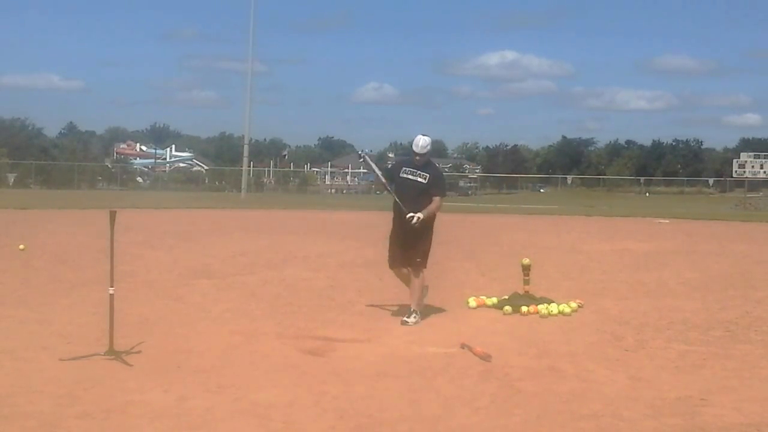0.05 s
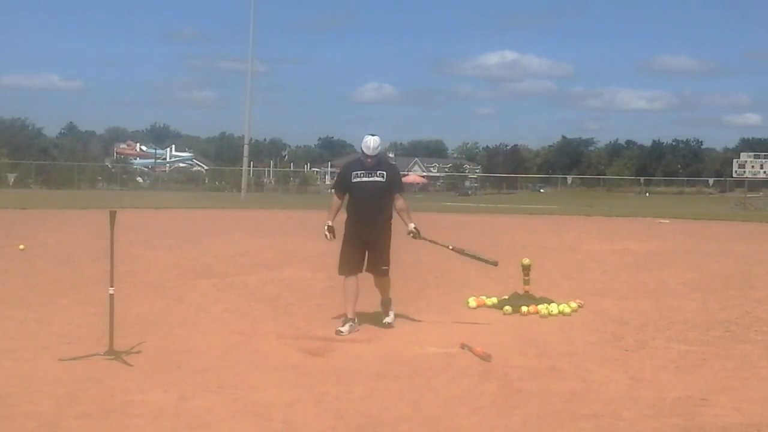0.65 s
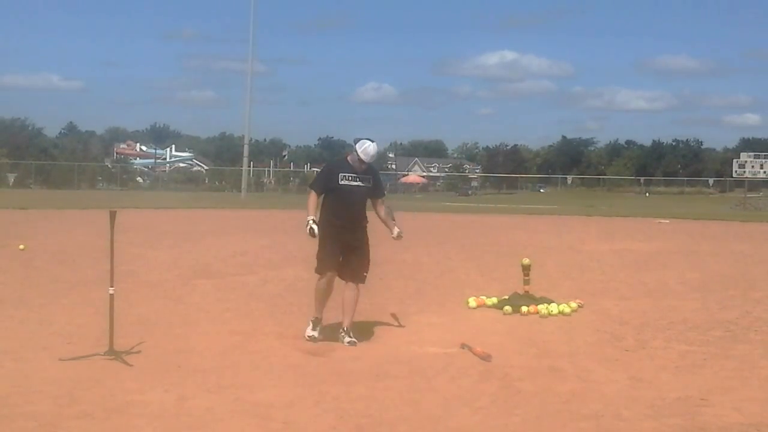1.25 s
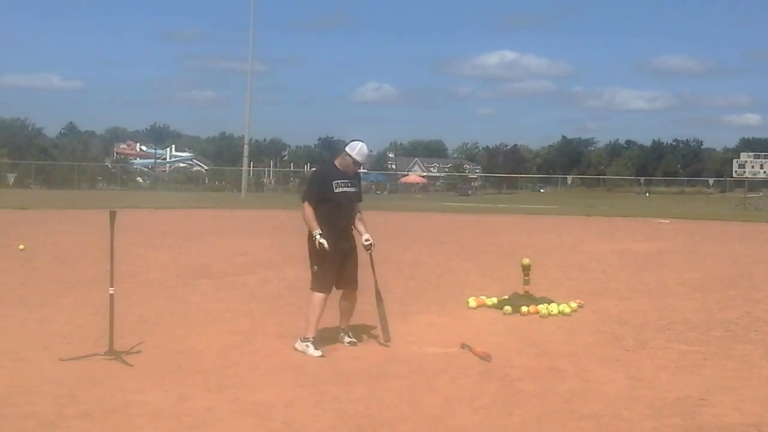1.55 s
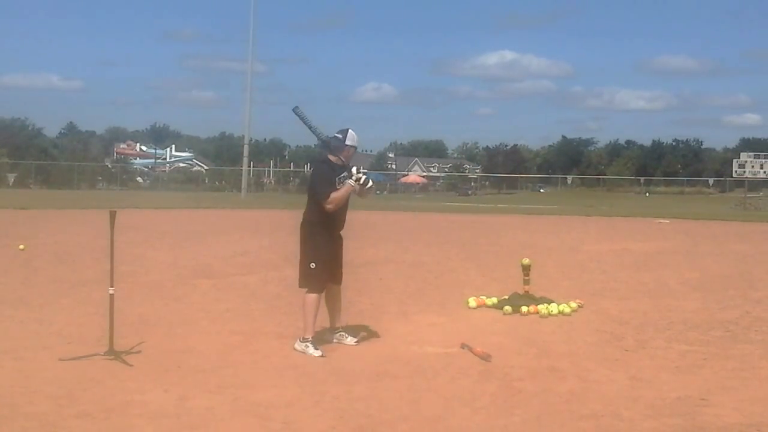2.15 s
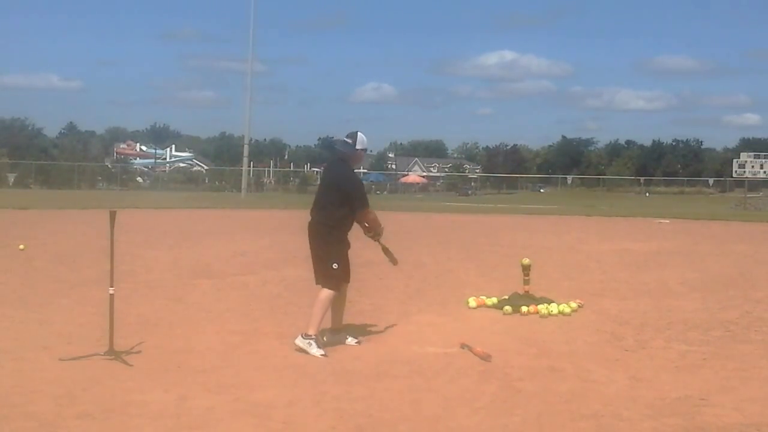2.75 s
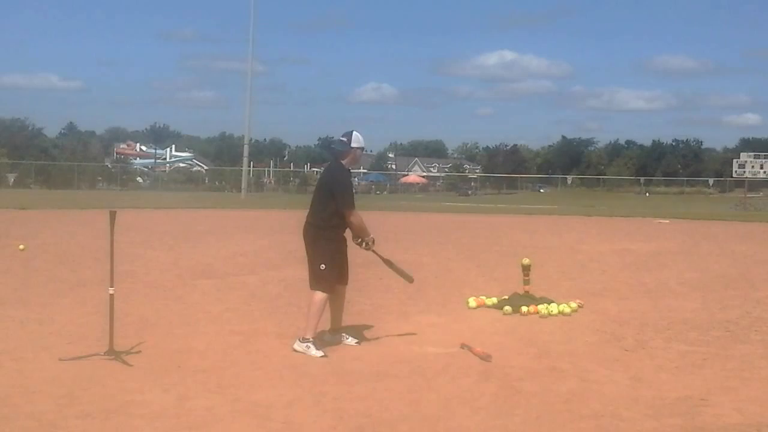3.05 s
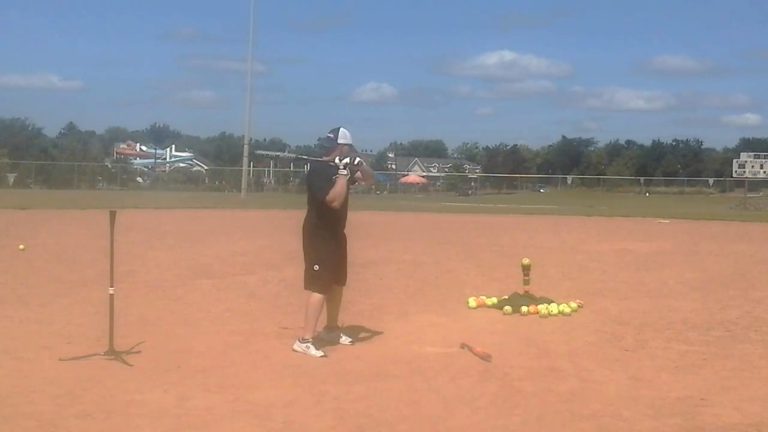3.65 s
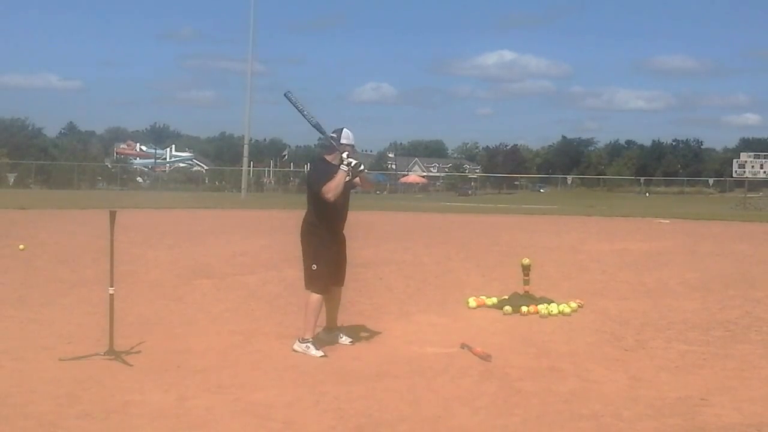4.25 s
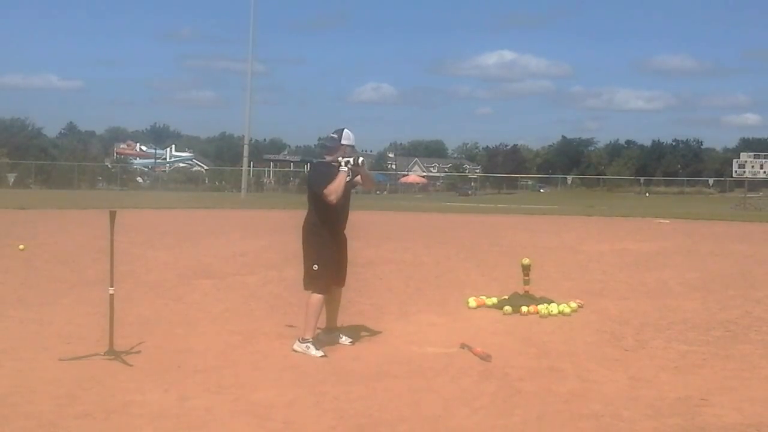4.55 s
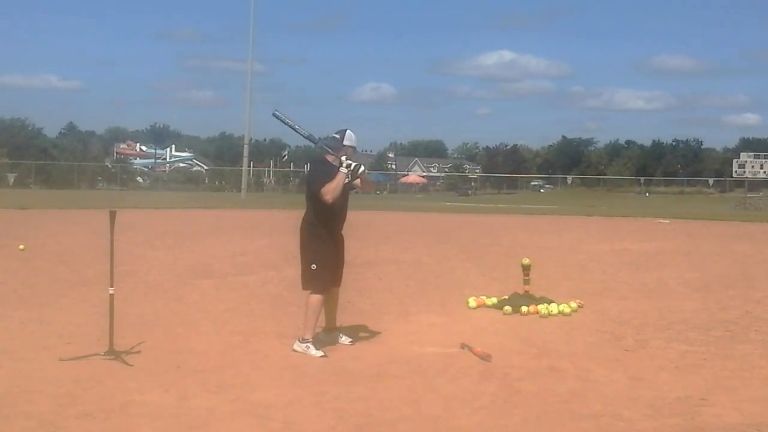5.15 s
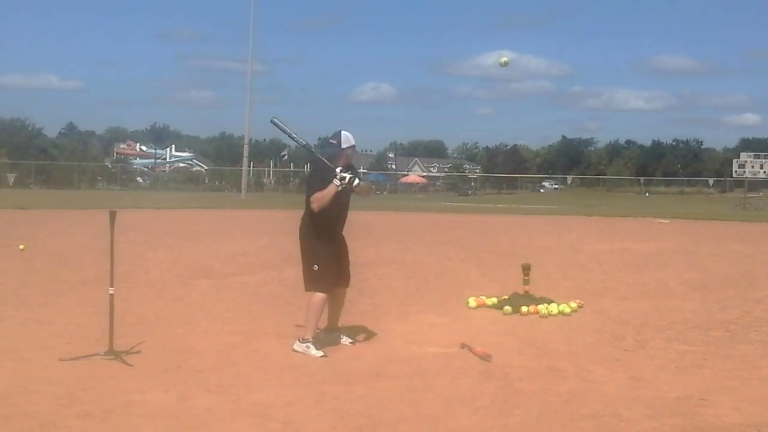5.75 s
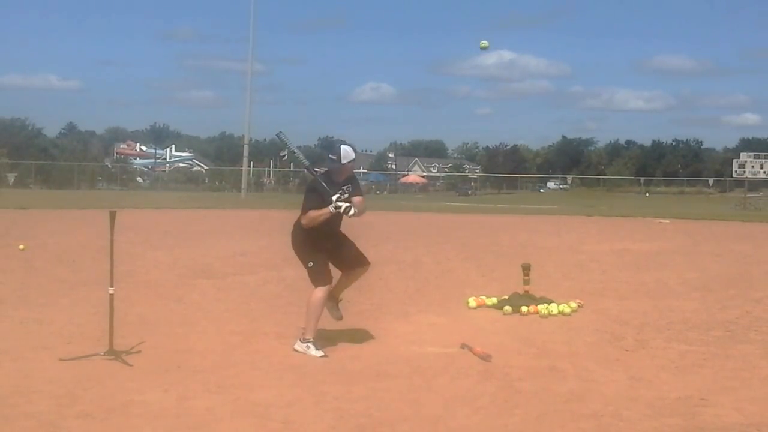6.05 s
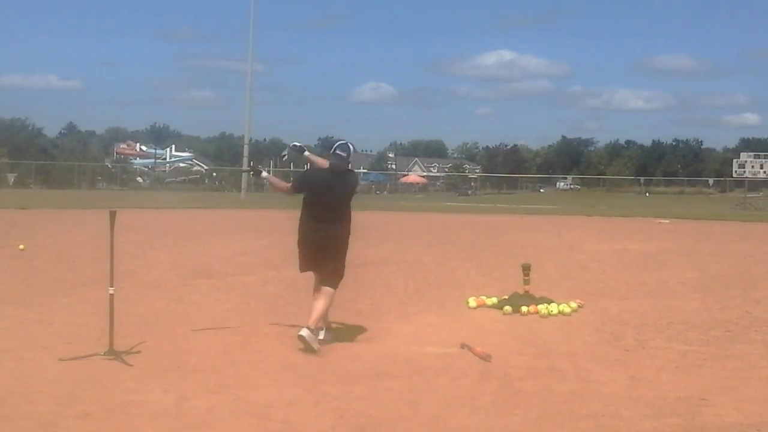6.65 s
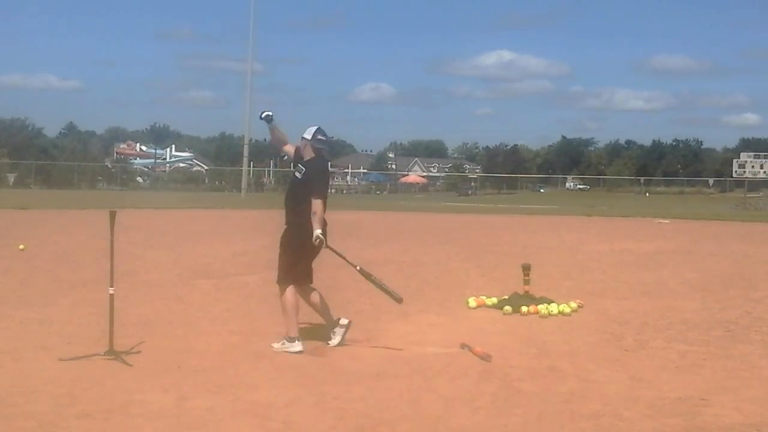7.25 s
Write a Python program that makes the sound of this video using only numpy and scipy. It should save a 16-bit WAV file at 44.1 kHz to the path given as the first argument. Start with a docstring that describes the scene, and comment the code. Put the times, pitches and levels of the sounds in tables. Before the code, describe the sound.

From the start there is a quiet open field: a faint, high shimmer of insects, a cricket chirping unevenly and a few thin bird whistles over low distant rumble and fine hiss. A far engine putters with rapid rasping puffs. At about 3.6 seconds a light breeze begins bumping softly on the microphone, and the engine ebbs between 4 and 5 seconds. At about 5.4 seconds a launcher lobs a ball with a short, soft, hollow pop and a slightly whistling spit of air that quickly trails off. At about 6.6 seconds a bat meets the ball with one sharp, bright, ringing crack, by far the loudest sound, briefly overloading the microphone. Quick echoes return from fences and trees and die away within a second. The engine drifts back in, and the insects carry on until the end at about 7.4 seconds.

```python
"""Batting practice on an open softball field. Insects and a few thin birds sing from the start, over the
rasping puffs of a far engine. Midway a light breeze picks up on the microphone and the engine ebbs.
At 5.4 s a launcher lobs a ball with a hollow pop and a whistling spit of air. At 6.6 s the bat meets it
with one sharp, ringing crack that overloads the microphone and echoes from fences, banks and trees,
while the engine drifts back in."""
import sys
import numpy as np
from scipy.fft import rfft, irfft, next_fast_len
from scipy.io import wavfile
from scipy.ndimage import map_coordinates

SR = 44100
rng = np.random.default_rng(int(sys.argv[2]) if len(sys.argv) > 2 else 0)


def unload_wav(signal):
    """Save mono or channel-first audio to the path in sys.argv[1] as 16-bit WAV at rate SR, clipped to [-1, 1]."""
    wavfile.write(
        sys.argv[1],
        SR,
        np.round(np.clip(np.atleast_2d(signal).T, -1, 1) * 32767).astype(np.int16),
    )


N = 326119
T = np.arange(N) / SR
HIT_S = 6.6412  # bat meets ball


def bat():
    """The blow sets off ringing tones under a bright contact snap and a short burst of noise."""
    # ringing tones of the crack, including a late-swelling ring near 5 kHz:
    # pitch_hz, level_db, t60_s, rise_s, left_over_right_db
    tones = [(300, -24, 0.013, .0003, 0.5), (560, -14, 0.013, .0003, 0.5), (840, -13, 0.011, .0003, -2.5),
             (1106, -4.5, .046, .0035, 6), (1470, -16.5, 0.041, 0.0011, 14.5),
             (1610, -20.5, .054, .0003, 10), (1710, -3.5, 0.015, 0.00019, -4.5),
             (2030, -16, .022, .0003, 0), (2190, -18, 0.096, .002, -2), (2712, -23.5, 0.085, .0005, 9),
             (3220, -26, 0.068, .0005, -4), (3740, -23, 0.075, .00055, -5), (4480, -23, 0.056, .001, -14),
             (4660, -19, 0.076, .001, -1), (4875, -.5, 0.032, 0.0038, -12), (5060, -22, .06, .004, 0),
             (5030, -14, 0.033, .001, -4), (5600, -24, .05, .001, -2), (5800, -25, 0.042, .0004, 1),
             (6047, -4, 0.027, 0.00012, 1.5), (7230, -25, .06, .001, -1), (7180, -21, .028, .00026, 0),
             (7220, -21, 0.032, .0005, -9), (7750, -36, 0.033, .0003, 4), (8100, -34, .035, .0003, 0),
             (8700, -29, .02, .0003, 0)]
    # spectrum of the first instant of contact: frequency_hz, relative_db
    contact_eq = [(1000, -20), (5000, -2), (8000, 0), (11000, -12), (14000, -5), (16000, -5)]
    # spectrum of the noisy body of the crack: frequency_hz, relative_db
    crack_eq = [(60, -28), (250, -23), (650, -16), (1100, -3), (1400, 0), (1800, 3), (2500, -7.5),
                (4100, -7.5), (5100, 3.5), (6100, 1), (7500, -1.5), (9500, -17), (14000, -31)]
    t, ring = T[:SR // 2], np.zeros((2, N))
    for hz, db, t60, rise, side_db in tones:
        tone = np.sin(2 * np.pi * hz * t + rng.uniform(0, 2 * np.pi))
        add(ring, HIT_S, pan(side_db) * amp(db) * decay(t, t60, rise) * tone)
    contact = amp(-12) * decay(T - HIT_S, t60=.0064, rise=.0004)
    snap = contact * noise(contact_eq, alike_hz=8000, lag_ms=.04)
    # the blow arrives again 3.7 ms later, off the packed dirt
    direct, bounced = (decay(T - s, t60=.034, rise=.00017) for s in (HIT_S, HIT_S + .0037))
    burst = amp(-10) * np.hypot(direct, amp(-4) * bounced) * noise(crack_eq, alike_hz=3950, lag_ms=.074)
    return ports(ring, lag_ms=.04) + snap + burst


def echoes():
    """The crack returns bright from fences and hollow from banks, then lingers over ground and trees."""
    # reflectors, each favouring one tone: delay_s, bright_db, dull_db, t60_s, tone_hz, tone_db
    reflectors = [(0.012, -15, -17.5, 0.055, 5450, -29), (0.02, -29, -24, .008, 5200, -27),
                  (.036, -26, -40, .05, 5000, -28), (.042, -26, -25.5, 0.042, 1750, -27),
                  (0.06, -28, -25, 0.011, 4900, -30), (0.065, -33, -23.5, .008, 5100, -31),
                  (.073, -30, -32, .05, 5300, -28), (0.085, -47, -36, 0.059, 1110, -37),
                  (.103, -40, -46, 0.035, 5200, -41), (.114, -46, -40, .025, 1750, -33),
                  (.087, -55, -54, .12, 1260, -33), (.131, -46, -54, .1, 1260, -37),
                  (.202, -37, -40, .07, 5100, -41), (.237, -35, -46, .035, 6060, -28.5),
                  (.26, -46, -43, 0.1, 6060, -48), (.376, -45, -45, .046, 4950, -45)]
    # low answers from the far banks: delay_s, level_db, t60_s, pitch_hz
    banks = [(.058, -36, .06, 687), (.083, -32.5, .06, 580)]
    # spectrum of the crack scattered over the field: frequency_hz, relative_db
    scatter_eq = [(100, -22), (350, -20), (600, -4.5), (850, -2.5), (1120, 6), (1450, -6.5), (1750, -2),
                  (2500, -12), (3600, 0.5), (4300, -5.5), (5050, 1), (6000, -3), (7800, -6.5), (9400, -18),
                  (10500, -50), (14000, -70)]
    # spectrum of the rough part of the banks' answers: frequency_hz, relative_db
    boom_eq = [(200, -30), (400, -5), (600, 2), (750, -2), (1000, -16), (2000, -50)]
    # spectrum of the soft wash from the tree line: frequency_hz, relative_db
    trees_eq = [(300, -22), (800, -3), (1150, -8), (1400, -10), (1750, 5), (2000, -9), (2220, -3),
                (2600, -17), (4300, -12), (5000, -7), (5900, -6), (6500, -15), (7400, -7), (9500, -32),
                (12000, -65)]
    # spectrum of the crack off wire mesh and posts: frequency_hz, relative_db
    mesh_eq = [(500, -38), (1700, -19), (2500, -9), (3300, -7), (4200, -14), (4950, 10), (5300, -1),
               (5650, 1), (6050, -4), (6500, -17), (7400, -8), (9000, -20), (12000, -57)]
    t = T - HIT_S
    bright, dull, tones = np.zeros((3, N))
    for delay, bright_db, dull_db, t60, hz, tone_db in reflectors:
        shape = decay(t - delay, t60, rise=.05 * t60)  # a longer-ringing reflector has a softer attack
        bright += amp(bright_db) * shape
        dull += amp(dull_db) * shape
        tones += amp(tone_db) * shape * np.sin(2 * np.pi * hz * t + .4 * wobble(300))
    near = amp(-21.5) * decay(t, t60=.19, rise=.0032)
    far = amp(-42.5) * decay(t, t60=1.6, rise=.084)
    scatter = np.sqrt(dull ** 2 + near ** 2 + far ** 2) * noise(scatter_eq, alike_hz=1780, lag_ms=.23)
    rough = amp(-3) * noise(boom_eq, alike_hz=1800, lag_ms=.13)
    booms = np.zeros((2, N))
    for delay, db, t60, hz in banks:
        hollow = np.sin(2 * np.pi * hz * t + .4 * wobble(200))
        booms += amp(db) * decay(t - delay, t60, rise=.003) * (hollow + rough)
    trees = amp(-44) * decay(t - .2, t60=.46, rise=.026) * noise(trees_eq, alike_hz=1500, lag_ms=.27)
    fences = amp(-3.5) * bright * noise(mesh_eq, alike_hz=4000, lag_ms=.046)
    ringing = ports(tones, lag_ms=.13)
    return scatter + pan(5.1) * booms + trees + pan(-10.5) * fences + pan(-1.5) * ringing


def launcher():
    """A hollow double pop inside a crackling spit of air that swells, falls quickly and trails off."""
    # thumps that make up the pop: start_s, level_db, pitch_hz, t60_s
    thumps = [(5.4452, -31, 417, 0.033), (5.4577, -23, 473, 0.016), (5.4578, -23, 800, 0.017),
              (5.4634, -21.5, 625, 0.039), (5.481, -27, 614, .055)]
    # sharp snaps in the air burst: start_s, level_db
    snaps = [(5.4444, -25.5), (5.4548, -37), (5.458, -29), (5.465, -26), (5.469, -31), (5.4722, -28),
             (5.480, -26), (5.4842, -24), (5.503, -32), (5.507, -35), (5.519, -35), (5.5498, -39),
             (5.606, -31.5)]
    # spectrum of the air burst as heard, with the microphone's 5 kHz resonance: frequency_hz, relative_db
    spit_eq = [(200, -14), (600, 3.5), (1200, -8), (2400, -14), (3700, -10), (4500, -1.5), (5050, 2.5),
               (6000, -3), (7400, -2.5), (8600, -12), (10000, -19), (14000, -61)]
    peak_s, rise_db_per_s, fall_db_per_s, trail_db_per_s = 5.467, 360, 202, 28
    t, pop = T[:SR // 4], np.zeros(N)
    for s, db, hz, t60 in thumps:
        add(pop, s, amp(db) * decay(t, t60, rise=.00045) * np.sin(2 * np.pi * hz * t))
    before, after = np.maximum(peak_s - T, 0), np.maximum(T - peak_s, 0)
    release = amp(-36 - fall_db_per_s * after) + amp(-53.5 - trail_db_per_s * after)
    flow = release * amp(1.5 * wobble(300) - rise_db_per_s * before)
    for s, db in snaps:
        add(flow, s, amp(db) * decay(t, t60=.0054, rise=.0001))
    air = flow * noise(spit_eq, alike_hz=5030, lag_ms=.09)
    return ports(pop + whistle(), lag_ms=.084) + pan(-3.5) * air


def whistle():
    """The first air through the launcher's mouth sounds a short, unsteady rising tone."""
    peak_s, glide_s, fade_db_per_s = 5.438, .02, 950
    hz = np.interp(T, [peak_s - glide_s, peak_s], [4800, 6900]) * (1 + .026 * wobble(900))
    level = amp(-39.5 - fade_db_per_s * np.abs(T - peak_s))
    return level * np.sin(2 * np.pi * np.cumsum(hz) / SR)


def insects():
    """A shimmering far chorus, nearer buzzes that swell out of it, and one cricket chirping unevenly."""
    # spectrum of the far chorus: frequency_hz, relative_db
    chorus_eq = [(2500, -23), (3400, -8.5), (4300, -6.5), (4900, 2), (5450, 1.5), (5750, -3.5),
                 (6000, -7.5), (6350, -10.5), (7500, -8), (8500, -15), (9500, -40), (14000, -62)]
    # spectrum of the nearer insects: frequency_hz, relative_db
    buzz_eq = [(3000, -24), (4100, -10), (4550, 0), (5000, 1.5), (5400, 0), (6000, -8), (6600, -20),
               (8000, -19), (11000, -52)]
    # swells of the nearer insects: peak_s, level_db, half_length_s
    buzzes = [(.3, -62, 0.35), (.95, -57, 0.2), (1.72, -60.5, 0.25), (2.69, -60.5, 0.1), (3.52, -58, 0.27),
              (4.86, -58.5, 0.15), (6.15, -62, .15), (7.0, -58, 0.2)]
    # the cricket's chirps: peak_s, relative_db, half_length_s, pitch_hz
    chirps = [(.097, -56, 0.009, 5560), (.145, -55, 0.009, 5490), (0.308, -55, .01, 5420),
              (1.803, -52, 0.0072, 5500), (1.837, -49.5, 0.01, 5500), (1.895, -58, .012, 5485),
              (1.965, -59, .015, 5510), (2.194, -52, 0.01, 5490), (2.275, -58, .012, 5490),
              (2.318, -58, .015, 5470), (2.37, -55, .01, 5480), (2.47, -58, .008, 5490),
              (2.58, -55, 0.0093, 5490), (2.615, -52, 0.0092, 5480), (2.687, -51, 0.0098, 5500),
              (2.99, -59, .014, 5500), (3.037, -58, .015, 5490), (3.098, -42, .014, 5470),
              (3.15, -51.5, .012, 5510), (3.358, -56, 0.014, 5490), (3.499, -50.5, 0.0074, 5360),
              (3.509, -53, 0.009, 5480), (3.547, -57, .009, 5470), (3.853, -51, 0.021, 5470),
              (3.984, -57, .022, 5480), (4.044, -53, .018, 5440), (4.352, -51, 0.017, 5470),
              (4.71, -58, .021, 5480), (4.806, -58, 0.023, 5450)]
    shimmer = amp(-56.5 + .36 * wobble(9) + 1.13 * wobble(70))
    chorus = shimmer * noise(chorus_eq, alike_hz=2500, lag_ms=.32)
    buzz_level = sum(amp(db) * swell(s, half) for s, db, half in buzzes)
    buzz = buzz_level * amp(1.7 * wobble(70)) * noise(buzz_eq, alike_hz=2500, lag_ms=.28)
    waver = .34 * wobble(120)
    song = sum(amp(db) * swell(s, half) * np.sin(2 * np.pi * hz * T + waver)
               for s, db, half, hz in chirps)
    return pan(-6) * (chorus + buzz) + amp(2.5) * pan(-1) * ports(song, lag_ms=.074)


def engine():
    """A far engine to the right: each firing is a rasping puff that rings the housing, over a drone."""
    # the engine holds, fades and comes back twice: time_s, relative_db
    fader = [(0, -57), (.65, -55.5), (2.35, -55), (3.8, -55.5), (4.75, -62), (5.33, -70.5), (6.15, -60),
             (6.58, -68.5), (6.85, -58), (7.39, -63)]
    # engine speed: time_s, firings_per_s
    speed = [(0, 33.4), (.6, 33.3), (1.3, 33.15), (1.9, 35.35), (2.5, 35.45), (3, 33.9), (3.6, 34.5),
             (4.1, 35.75), (4.8, 35.35), (5.4, 35.4), (6, 34.3), (7.39, 35.55)]
    # a limping cycle, one weak firing and two strong: place_in_cycle (0-1), relative_db
    cylinders = [(.27, -1), (.57, 0), (.935, 0)]
    # firings that knock harder: peak_s, boost_db
    knocks = [(.635, 3.5), (.72, 4.5), (.81, 4), (.90, 5), (1.445, 4), (1.707, 4), (1.877, 4.5),
              (2.185, 1.5), (2.303, 6), (2.425, 2), (2.668, 3), (3.165, 3), (3.43, 1)]
    # resonances of the housing: centre_hz, width_hz, relative_db
    resonances = [(845, 40, -4), (1436, 38, -6.5), (1800, 153, -0.5)]
    # spectrum of the rasp: frequency_hz, relative_db
    rasp_eq = [(300, -30), (700, -11.5), (1100, -15.5), (1500, -2.5), (1900, -2), (2300, -1.5), (2700, -1),
               (3100, -5), (3600, -20), (6000, -19), (10000, -49)]

    def housing(f):
        """The resonances act as parallel band-pass filters."""
        return sum(amp(db) * 1j * f * width / (hz ** 2 - f ** 2 + 1j * f * width)
                   for hz, width, db in resonances)

    cycle_hz = curve(speed) / len(cylinders)
    cycles = np.cumsum(cycle_hz) / SR
    force = amp(.9 * wobble(30) + sum(db * swell(s, half=.014) for s, db in knocks))
    puffs = sum(amp(db) * decay((cycles - place) % 1 / cycle_hz, t60=.069, rise=.012)
                for place, db in cylinders)
    rasp = unit((force * puffs + .06) * noise(rasp_eq, alike_hz=14100, lag_ms=.36))
    strikes = force * puffs ** 2 * rng.standard_normal(N)
    ring = unit(filtered(ports(strikes, lag_ms=.33), housing))
    drone = ports(np.sin(2 * np.pi * 15 * cycles + .7 * wobble(12)), lag_ms=.24)
    level_db = curve(fader)
    ring_db = -58 + .77 * (level_db - level_db.max())  # the ring fades less than the rasp
    return amp(level_db - .2) * rasp + amp(ring_db) * ring + amp(-59 + 3.1 * wobble(6)) * drone


def breeze():
    """A light wind picks up midway and breaks into different lumps on each microphone port."""
    # gusts that bump the microphone: peak_s, level_db, half_length_s
    gusts = [(0.663, -68, 0.021), (2.245, -62, 0.12), (3.675, -48, 0.038), (3.802, -43.5, 0.021),
             (4.22, -56, .05), (4.5, -48.5, 0.043), (4.733, -54.5, 0.037), (5.593, -49, .025),
             (5.84, -54.5, 0.059), (6.074, -47, 0.0098), (6.128, -53, .025)]
    # spectrum of the buffeting: frequency_hz, relative_db
    buffet_eq = [(20, -9), (50, -0.5), (105, -0.5), (180, -6), (300, -19.5), (700, -42), (2000, -90)]
    steady = amp(np.interp(T, [3.58, 3.68], [-69.5, -59.5]) + 2.2 * wobble(8.1))
    gust_power = sum((amp(db) * swell(s, half)) ** 2 for s, db, half in gusts)
    lumps = unit(amp(2.5 * np.array([wobble(40), wobble(40)])))
    return np.sqrt(steady ** 2 + gust_power) * lumps * noise(buffet_eq, alike_hz=29.8, lag_ms=.1)


def far_notes():
    """Thin, slightly wavering far notes: bird whistles and one longer insect tone near 6 kHz."""
    # thin far notes: peak_s, level_db, half_length_s, pitch_hz, glide_hz_per_s
    notes = [(.23, -64, .04, 8400, -4500), (.43, -61, 0.1, 5950, 1), (1.0, -65, .04, 6450, -2),
             (3.99, -64, .035, 6280, -3), (4.657, -66, .035, 8300, -4000), (4.98, -65, .04, 6120, -2)]
    song = np.zeros(N)
    for s, db, half, hz, glide in notes:
        phase = 2 * np.pi * np.cumsum(hz + glide * (T - s) + 80 * wobble(300)) / SR
        song += amp(db) * swell(s, half) * np.sin(phase)
    return ports(song, lag_ms=.086)


def ambience():
    """A bed of distant rumble under the microphone's own fine hiss."""
    # spectrum of the far surroundings: frequency_hz, relative_db
    rumble_eq = [(20, -24), (60, -11), (120, -4.5), (172, 1), (230, -5.5), (380, -6.5), (560, -17.5),
                 (1200, -15), (2000, -19.5), (2700, -20.5), (3800, -18.5), (9000, -73)]
    # spectrum of the microphone's hiss: frequency_hz, relative_db
    hiss_eq = [(30, -14), (300, 6), (1200, -1), (2500, -6.5), (5000, -6.5), (9000, -9.5), (11000, -15),
               (14400, -14.5), (14900, -45)]
    rumble = amp(-53 + .55 * wobble(2.86)) * noise(rumble_eq, alike_hz=2050, lag_ms=.28)
    return rumble + amp(-57.5) * noise(hiss_eq, alike_hz=100, lag_ms=.11)


def amp(db):
    """Decibels to gain."""
    return 10 ** (np.asarray(db) / 20)


def unit(x):
    """Scale to rms 1."""
    return x / np.sqrt(np.mean(x ** 2) + 1e-20)


def curve(points):
    """Straight lines through (time_s, value) points, one value per sample."""
    return np.interp(T, *np.transpose(points))


def wobble(rate):
    """A smooth random curve with rate knots a second."""
    return map_coordinates(rng.standard_normal(int(N * rate / SR) + 4), [T * rate])


def swell(s, half):
    """A bell-shaped rise and fall around time s."""
    return np.exp(-((T - s) / half) ** 2 / 2)


def decay(t, t60, rise):
    """A struck envelope: silent before t = 0, a quick rise, an exponential fall."""
    t = np.maximum(t, 0)
    return np.exp(-np.log(1000) * t / t60) * (1 - np.exp(-t / rise))


def filtered(x, response):
    """Filter x by a complex response of frequency."""
    size = next_fast_len(N + SR // 2)
    return irfft(rfft(x, size) * response(np.fft.rfftfreq(size, 1 / SR)), size)[..., :N]


def pan(db):
    """Left and right gains for a level difference; positive leans left."""
    return amp(np.array([[db], [-db]]) / 2)


def ports(x, lag_ms):
    """One wave at both microphone ports, the left one lag_ms later."""
    delay_s = lag_ms / 1000 * np.array([[.5], [-.5]])
    return filtered(x, lambda hz: np.exp(-2j * np.pi * hz * delay_s))


def noise(spectrum, alike_hz, lag_ms):
    """Stereo noise of rms 1, shaped by (Hz, dB) points; both ports hear one wave below alike_hz."""
    shared = lambda hz: 1 / np.sqrt(1 + (hz / alike_hz) ** 2)
    common = filtered(ports(rng.standard_normal(N), lag_ms), shared)
    own = filtered(rng.standard_normal((2, N)), lambda hz: np.sqrt(1 - shared(hz) ** 2))
    points_hz, db = np.transpose(spectrum)
    eq = lambda hz: amp(np.interp(np.log(hz + 1), np.log(points_hz), db))
    return unit(filtered(common + own, eq))


def add(track, s, sound):
    """Mix a short sound into the track at time s."""
    part = track[..., round(s * SR):][..., :sound.shape[-1]]
    part += sound[..., :part.shape[-1]]


def scene():
    """The launch and the hit over the life of the field."""
    return bat() + echoes() + launcher() + insects() + far_notes() + engine() + breeze() + ambience()


def record(dry):
    """Flip the right channel's polarity, soft-clip the crack at full scale and cut the top steeply."""
    top_hz = 15400
    flipped = dry * np.array([[1], [-1]])
    clipped = flipped / (1 + np.abs(flipped) ** 6) ** (1 / 6)
    return filtered(clipped, lambda hz: 1 / np.sqrt(1 + (hz / top_hz) ** 120))


dry = scene()
out = record(dry)
unload_wav(out)
```